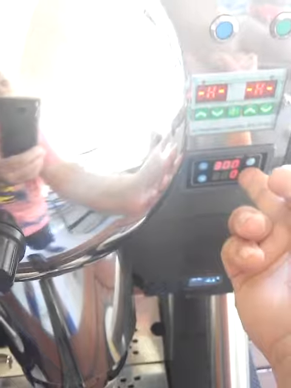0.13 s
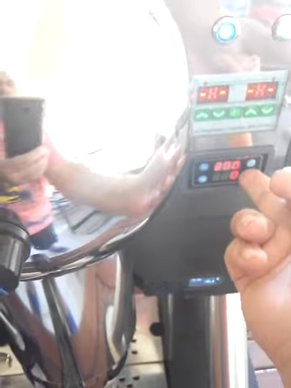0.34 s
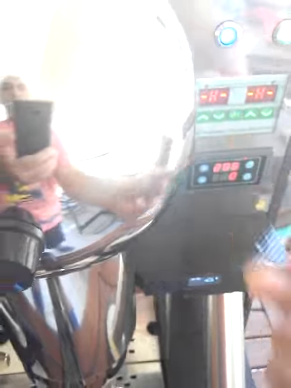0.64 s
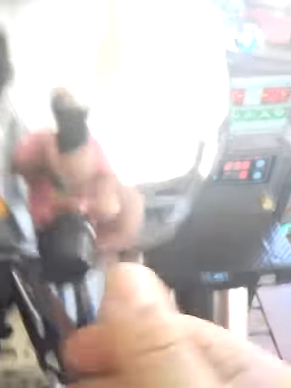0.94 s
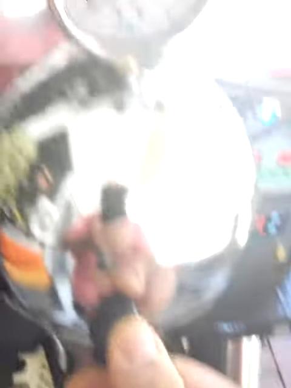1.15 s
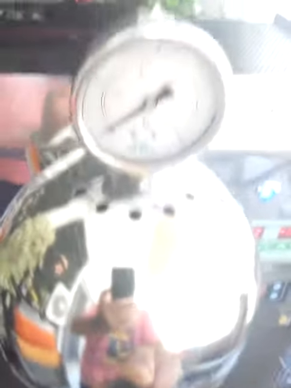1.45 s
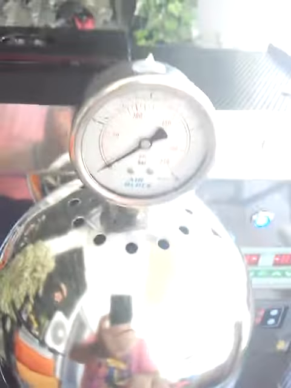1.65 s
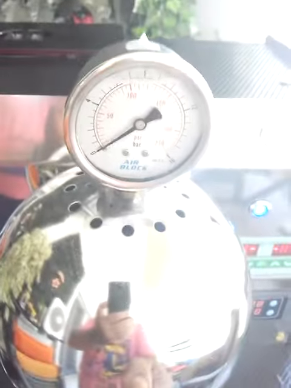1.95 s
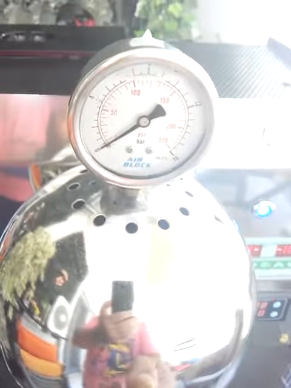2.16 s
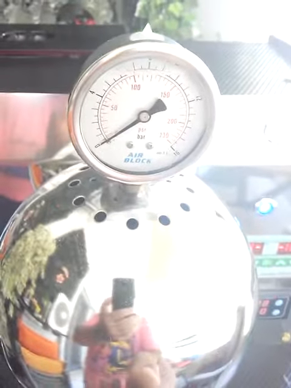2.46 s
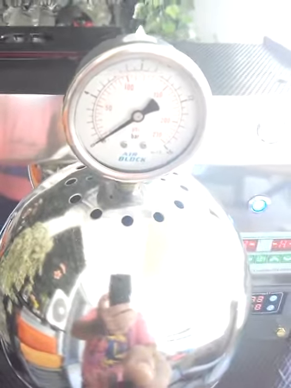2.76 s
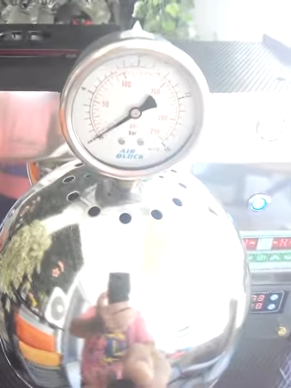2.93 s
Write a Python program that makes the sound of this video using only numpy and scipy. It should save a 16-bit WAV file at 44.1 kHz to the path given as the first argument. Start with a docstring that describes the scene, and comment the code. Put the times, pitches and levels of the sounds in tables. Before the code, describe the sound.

An espresso machine pump clicks on and runs with a steady, loud, rattling electric buzz.

```python
"""An espresso machine's vibrating pump starts up, its piston stroking once per mains cycle.
The frame hums at multiples of the stroke rate, the metal case buzzes, a loose part rattles, water hisses.
The case rings harder for the first second, then settles.
Just before, a relay ticks (short noise burst) and the valve clacks open (cracks and decaying modes).
Behind: a faint sliding whistle, a hiss that dies away, and a rumbling room with two drones."""
import sys
import numpy as np
from scipy import signal
from scipy.fft import rfft, irfft
from scipy.io import wavfile

SR = 44100
rng = np.random.default_rng(int(sys.argv[2]) if len(sys.argv) > 2 else 0)


def persist_wave(psi):
    """Save psi, clipped to +-1, as 16-bit WAV."""
    counts = np.round(np.clip(psi, -1, 1) * 32767).astype(np.int16)
    wavfile.write(sys.argv[1], SR, np.atleast_2d(counts).T)


N = 136710
T = np.arange(N) / SR
HZ = np.maximum(np.fft.rfftfreq(N, 1 / SR), 1)

STROKE_HZ, START_S, FIRST_STROKE_S = 50.0, 0.664, 0.6775
CASE_ROUGH = 0.28  # share of stroke power that is new every time
SAME_BELOW_HZ = 380  # left and right merge below this


def from_db(db):
    """Decibels to gain."""
    return 10 ** (np.asarray(db) / 20)


def rms_one(x):
    """Scale to unit power."""
    return x / np.sqrt(np.mean(x ** 2) + 1e-20)


def at_hz(rows):
    """Read each column of a table along log frequency."""
    hz, *columns = np.transpose(rows)
    return [np.interp(np.log(HZ), np.log(hz), column) for column in columns]


def at_time(rows):
    """Read a (time, level) table along time."""
    return np.interp(T, *np.transpose(rows))


def noise():
    """Two unrelated white noises."""
    return rng.standard_normal((2, N))


def drift(rate_hz):
    """Slow random motion of spread 1: low-passed noise."""
    return rms_one(irfft(rfft(rng.standard_normal(N)) / (1 + (HZ / rate_hz) ** 2), N))


def colour(x, spectrum):
    """Give a steady sound a spectrum."""
    return irfft(rfft(x) * from_db(at_hz(spectrum)[0]), N)


def highpass(x, order, edge_hz):
    """Butterworth high-pass."""
    return signal.sosfilt(signal.butter(order, edge_hz, "high", fs=SR, output="sos"), x)


def resonate(x, hz, width_hz):
    """A resonance with steep skirts: two equal two-pole sections in series."""
    r = np.exp(-np.pi * 1.5 * width_hz / SR)
    section = [1 - r, 0, r - 1, 1, -2 * r * np.cos(2 * np.pi * hz / SR), r * r]
    return signal.sosfilt([section, section], x)


def stereo(pair):
    """Unrelated signals become left and right, the same in the bass, opposed in the treble; unit power."""
    # two microphones: hz, side_minus_mid_db, left_minus_right_db
    ears = [(450, -7.5, 1.5), (1400, -7.5, 1), (2200, -12.5, 5), (3300, -5.5, 2), (4170, -5.5, 5),
            (4650, 0, 6.5), (5680, 3.5, 3.5), (7700, 9, 1.5)]
    side_db, pan_db = at_hz(ears)
    apart = HZ ** 2 / (HZ ** 2 + SAME_BELOW_HZ ** 2)
    width = apart * from_db(side_db)
    pan = from_db(apart * pan_db / 2)
    mid, side = rfft(pair) * [np.ones_like(width), width] / np.sqrt(1 + width ** 2)
    return rms_one(irfft([(mid + side) * pan, (mid - side) / pan], N))


def running(rise_s):
    """The pump comes up to strength exponentially."""
    return 1 - np.exp(-np.maximum(T - START_S, 0) / rise_s)


def strokes(rough):
    """Dying chatter per stroke: one part repeats its waveform, the rough share is new every time."""
    decay_s, jitter_db = 0.031, 0.6
    period = round(SR / STROKE_HZ)
    number, place = np.divmod(np.arange(N) - int(FIRST_STROKE_S * SR), period)
    fall = np.exp(-np.arange(period) / SR / decay_s)

    # flat spectrum with the phases of a decaying burst; channels 90 degrees apart
    lines = np.exp(1j * np.angle(rfft(rng.standard_normal(period) * fall ** 2)))
    repeating = rms_one(irfft([lines, 1j * lines], period)[:, place])
    fresh = rms_one(noise() * fall[place])

    stroke_gain = from_db(jitter_db * rng.standard_normal(N // period + 2))
    strength = stroke_gain[number - number.min()]
    return strength * (np.sqrt(1 - rough) * repeating + np.sqrt(rough) * fresh)


def hum():
    """Frame hum: wavering sines at multiples of the stroke rate; balance shifts as the pump settles."""
    # partials: stroke_rate_multiple, first_level_db, settled_level_db
    partials = [(2, -39, -41), (3, -42.5, -41), (4, -44.5, -53.5), (5, -42.5, -42), (6, -45.5, -41),
                (7, -46, -39.5), (8, -47, -45.5), (9, -33.5, -36.5), (10, -48.5, -55.5), (11, -44, -45),
                (12, -52, -54.5), (13, -51, -48), (14, -49.5, -57), (15, -49, -58), (19, -62, -51.5),
                (20, -55, -54.5), (22, -62.5, -55), (23, -54, -59), (25, -63, -54)]
    waver_db, waver_hz, pan_db, settling_s = 0.37, 1.8, 4, 0.992
    lag_per_multiple_s = 0.0023  # the frame smears each stroke: higher multiples arrive later
    settled = np.clip((T - START_S) / settling_s, 0, 1)
    out = 0
    for multiple, first_db, last_db in partials:
        hz = multiple * STROKE_HZ
        apart = hz ** 2 / (hz ** 2 + SAME_BELOW_HZ ** 2)
        ear_db = pan_db * apart * np.array([[.5], [-.5]])
        level_db = first_db + (last_db - first_db) * settled + waver_db * drift(waver_hz)
        late_s = multiple * lag_per_multiple_s
        out = out + from_db(level_db + ear_db) * np.sin(2 * np.pi * hz * (T - late_s))
    return np.sqrt(2) * out  # sine peak from rms


def case():
    """Strokes ring the case; some resonances swell only while the pump takes up its load."""
    # steady resonances: hz, width_hz, level_db
    steady = [(1648, 110, -47), (2002, 19, -46), (2142, 43, -40), (2214, 54, -48.5), (2994, 40, -50),
              (3321, 86, -50)]
    # swelling resonances: centre_s, half_length_s, hz, width_hz, relative_level_db
    swells = [(.72, .07, 2430, 120, -37), (.78, .17, 2190, 150, -31.5), (.85, .18, 1935, 45, -33),
              (1.04, .13, 4350, 600, -43), (1.05, .08, 4600, 130, -39.5), (1.08, .13, 4340, 70, -44),
              (1.1, .17, 2200, 260, -33), (1.2, .09, 3340, 45, -41), (1.29, .13, 1750, 35, -38),
              (1.56, .05, 3200, 300, -43)]
    swell_rough, swell_db = 0.44, -0.5
    drive, straining = strokes(CASE_ROUGH), strokes(swell_rough)
    out = sum(from_db(db) * stereo(resonate(drive, hz, width_hz)) for hz, width_hz, db in steady)
    for centre_s, half_s, hz, width_hz, db in swells:
        swell = 1 / np.sqrt(1 + ((T - centre_s) / half_s) ** 6)
        out = out + from_db(swell_db + db) * swell * stereo(resonate(straining, hz, width_hz))
    return out


def rattle():
    """A loose part, shaken by the strokes, rings now more, now less."""
    # resonances: hz, width_hz, relative_level_db
    modes = [(3780, 14, -47), (3900, 60, -46.5), (4576, 260, -46)]
    # rattle strength: time_s, gain_db
    strength = [(.7, -6), (1.6, -1), (1.78, 1), (2.05, -4.5), (2.15, 3), (2.25, -4.5), (2.4, 3.5),
                (2.48, 5), (2.55, -5), (2.82, -0.5), (2.88, 5), (2.95, -3.5), (3.1, 2)]
    drive = strokes(CASE_ROUGH)
    rings = sum(from_db(db) * stereo(resonate(drive, hz, width_hz)) for hz, width_hz, db in modes)
    return rings * from_db(at_time(strength))


def load_gain_db():
    """Shared gain of rasp and water hiss: extra at the start, settling, with a random flicker."""
    extra_db, settle_s, flicker_db, flicker_hz = 3.5, 0.4, 2.14, 6.9
    extra = extra_db * np.exp(-np.maximum(T - START_S, 0) / settle_s)
    return extra + flicker_db * drift(flicker_hz)


def buzz(load_db):
    """Broad rasp: stroke chatter through a fixed spectrum."""
    # rasp spectrum: hz, density_db_per_hz (relative)
    rasp = [(600, -19), (900, -6.5), (1400, -5.5), (2300, 1.5), (2750, -4.5), (3600, -3.5), (4600, -5.5),
            (6000, -3.5), (8500, -40.5)]
    level_db, rough = -41.5, 0.46
    return from_db(level_db + load_db) * stereo(colour(strokes(rough), rasp))


def water(load_db):
    """Pipe hiss pulsing with the strokes, over a steady churn of rushing water and shaking frame."""
    # pipe hiss spectrum: hz, density_db_per_hz (relative)
    flow_spectrum = [(1200, -8.5), (2400, -0.5), (3500, -5), (4500, 2), (5600, -2.5), (7400, -0.5),
                     (8400, -23.5)]
    # churn spectrum: hz, density_db_per_hz (relative)
    churn_spectrum = [(60, -31), (130, -2.5), (180, -2), (260, -9), (450, -1), (600, -13), (800, -23),
                      (1300, -13), (2500, -60.5)]
    flow_db, pulse_db, churn_db = -40, 2, -42.5
    push_db = pulse_db * np.cos(2 * np.pi * STROKE_HZ * (T - FIRST_STROKE_S))
    flow = from_db(flow_db + load_db + push_db) * stereo(colour(noise(), flow_spectrum))
    return flow + from_db(churn_db) * stereo(colour(noise(), churn_spectrum))


def valve():
    """The valve slams and bounces: each blow is a noise crack and the same decaying modes."""
    # slam and bounces: start_s, relative_level_db, low_edge_hz
    blows = [(0.664, -9, 2010), (.6675, -14, 5000), (0.673, -12, 2020), (0.6815, -14, 3030)]
    # valve and bracket modes: hz, relative_level_db, t60_s
    modes = [(1270, -25, 0.047), (1930, -17, .06), (2363, -3, 0.026), (2600, -3.5, .014),
             (3255, -19.5, 0.12), (4110, -15.5, 0.039), (5300, -17, 0.03), (6310, -23.5, 0.074),
             (7600, -25.5, 0.034)]
    crack_db, crack_t60_s, crack_low_hz = -13, 0.065, 1700
    out = 0
    for start_s, blow_db, edge_hz in blows:
        age_s = np.maximum(T - start_s, 0)
        rings = 0
        for hz, mode_db, t60_s in modes:
            fall = from_db(mode_db - 60 * age_s / t60_s)
            rings = rings + fall * np.sin(2 * np.pi * hz * age_s) * rng.choice([-1, 1])
        crack = stereo(noise()) * (T > start_s) * from_db(crack_db - 60 * age_s / crack_t60_s)
        crack = highpass(crack, 2, crack_low_hz)
        panned_rings = rings * from_db([[1.5], [-1.5]])
        out = out + from_db(blow_db) * highpass(panned_rings + crack, 1, edge_hz)
    return out


def relay():
    """Small bright tick just before the valve: resonant noise with a sharp onset and decay."""
    start_s, level_db, hz, width_hz, t60_s = 0.6517, -24.5, 5300, 720, 0.066
    fall_db = level_db - 60 * np.maximum(T - start_s, 0) / t60_s
    return (T > start_s) * from_db(fall_db) * stereo(resonate(noise(), hz, width_hz))


def whistle():
    """Narrow hiss that slides down and rises again: slow noise on a gliding carrier."""
    # glide: time_s, pitch_hz, level_db
    glide = [(0, 4500, -60), (.06, 3800, -42.5), (.1, 3368, -41), (0.149, 3230, -39.5), (0.251, 3150, -48),
             (.31, 3200, -41.5), (.42, 3150, -54), (0.569, 3200, -73), (.61, 3320, -43), (.65, 3650, -49),
             (.72, 3750, -87)]
    width_hz = 100
    time_s, pitch_hz, level_db = np.transpose(glide)
    phase = 2 * np.pi * np.cumsum(np.interp(T, time_s, pitch_hz)) / SR
    pair = [drift(width_hz) * np.cos(phase) + drift(width_hz) * np.sin(phase) for _ in range(2)]
    return from_db(np.interp(T, time_s, level_db)) * stereo(np.array(pair))


def hiss():
    """Soft coloured noise dying away at a constant dB rate."""
    # hiss spectrum: hz, density_db_per_hz (relative)
    spectrum = [(2200, -28.5), (3300, -12.5), (5000, 0), (6200, -6), (8500, -23.5)]
    start_db, fade_db_per_s = -37.5, 16.5
    return from_db(start_db - fade_db_per_s * T) * stereo(colour(noise(), spectrum))


def room():
    """Steady rumble and hiss, with two low resonant-noise drones that come and go."""
    # room spectrum: hz, density_db_per_hz (relative)
    spectrum = [(25, -25), (45, -16.5), (62, -12.5), (110, -8), (200, -10.5), (360, -16.5), (480, -15),
                (600, -19), (1150, -26), (1700, -20.5), (2330, -18), (2800, -23.5), (4000, -29.5),
                (5300, -32), (6500, -31), (8500, -49)]
    # drones: hz, width_hz, relative_level_db
    drone_rows = [(66.3, 10, -41), (101, 8.9, -44)]
    # drone strength: time_s, gain_db
    strength = [(.1, 3.5), (.55, -5), (.9, -0.5), (2.15, 0), (2.8, -7.5), (3.1, -7)]
    level_db = -36
    drones = 0
    for hz, width_hz, db in drone_rows:
        tone = resonate(rng.standard_normal(N + SR), hz, width_hz)[SR:]  # skip the filter's build-up
        drones = drones + from_db(db) * rms_one(tone)
    return drones * from_db(at_time(strength)) + from_db(level_db) * stereo(colour(noise(), spectrum))


def scene():
    """The machine starts up in the room."""
    load_db = load_gain_db()
    chatter = case() + rattle() + buzz(load_db) + water(load_db)
    pump = running(rise_s=0.02) * hum() + running(rise_s=0.01) * chatter
    return pump + valve() + relay() + whistle() + hiss() + room()


def record(dry):
    """Steep elliptic low-pass at the top."""
    cutoff_hz = 8500
    return signal.sosfilt(signal.ellip(10, .2, 80, cutoff_hz, fs=SR, output="sos"), dry)


dry = scene()
out = record(dry)
persist_wave(out)
```